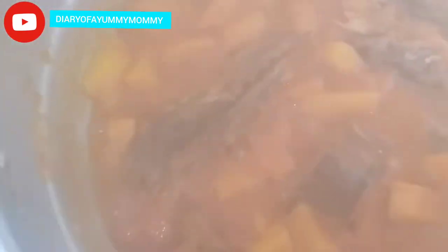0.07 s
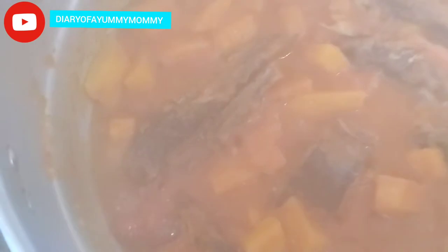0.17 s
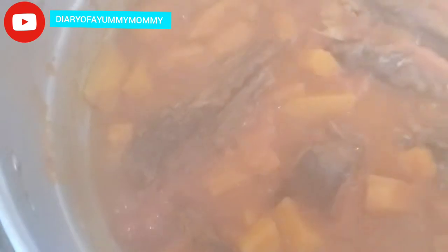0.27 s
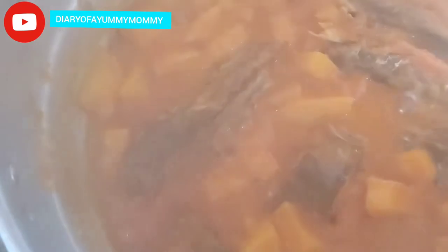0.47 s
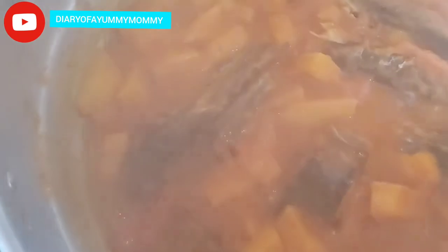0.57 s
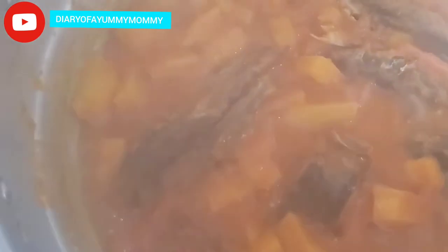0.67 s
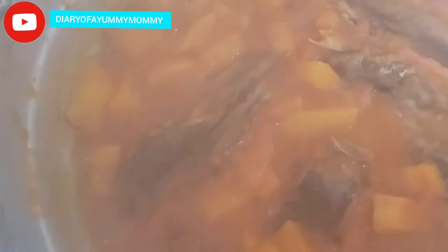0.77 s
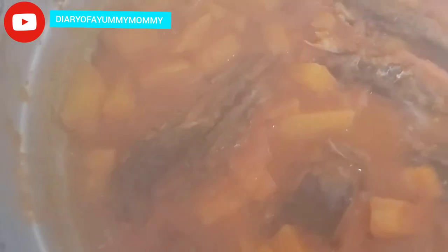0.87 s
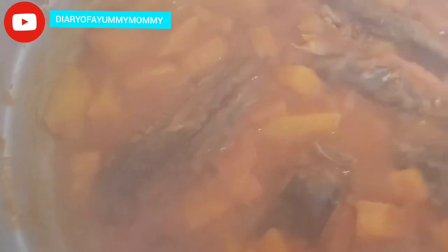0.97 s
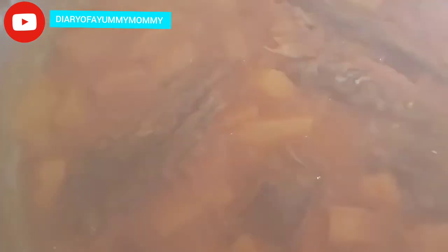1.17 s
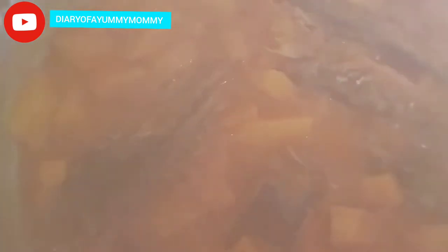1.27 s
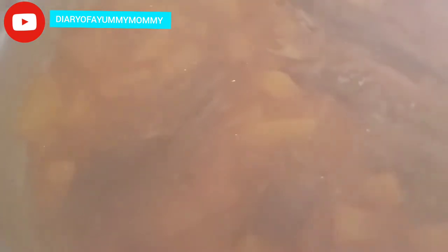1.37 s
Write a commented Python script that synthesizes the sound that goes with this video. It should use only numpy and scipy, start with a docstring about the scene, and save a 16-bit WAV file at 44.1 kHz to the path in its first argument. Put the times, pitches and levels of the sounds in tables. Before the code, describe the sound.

Thick porridge simmers close by with fizz, low plops and spits; a cabinet door knocks shut

```python
"""A fizz with low plops and sharp spits: thick porridge simmers in a pot close to a two-port phone microphone.
Off to the left a latch clicks, rattles and scrapes, then a cabinet door knocks shut and the kitchen booms.
The fizz is shaped noise, the bubbles are short gliding tones and the spits add a spray of noise.
Blows ring the modes of latch, spring, door panel and room. Gain control turns the simmer down after the knock."""
import sys
import numpy as np
from scipy import signal
from scipy.fft import rfft, irfft
from scipy.io import wavfile
from scipy.ndimage import uniform_filter1d

SR = 44100
rng = np.random.default_rng(int(sys.argv[2]) if len(sys.argv) > 2 else 0)


def ratio(d):
    """dB to gain"""
    e = np.asarray(d, float) / 20
    return 10 ** e


def store_pcm(level_fs):
    """Save levels as 16-bit WAV."""
    pcm = np.round(np.clip(level_fs, -1, 1) * 32767).astype(np.int16)
    wavfile.write(sys.argv[1], SR, np.atleast_2d(pcm).T)


N = 61739  # samples, 1.4 s


def evened(x):
    """Scales to rms 1."""
    return x / np.sqrt(np.mean(x ** 2) + 1e-20)


def read(points, hz):
    """Reads a table on a log-frequency axis."""
    f, value = np.transpose(points)
    return np.interp(np.log(hz + 1), np.log(f + 1), value)


def add(mix, start_s, sound):
    """Mixes a sound in at its start time, cut at the end of the mix."""
    part = mix[..., round(start_s * SR):][..., :sound.shape[-1]]
    part += sound[..., :part.shape[-1]]


def coloured(x, points):
    """Filters by a table of frequency in Hz and gain in dB."""
    gain = ratio(read(points, np.fft.rfftfreq(x.shape[-1], 1 / SR)))
    return irfft(rfft(x) * gain, x.shape[-1])


# Likeness of the sound at the two ports. Each row: frequency in Hz, left-right correlation (-1 to 1).
PORT_LIKENESS = [(60, 0.95), (150, 0.97), (380, 1), (950, 0.36), (2380, -0.23), (5980, -0.16),
                 (15000, -0.16)]


def pair(a, b, hz):
    """Two ports that share the bass and differ in the treble, mixed from two independent spectra."""
    same = np.clip(read(PORT_LIKENESS, hz), -1, 1)[:, None]
    return np.array([a, same * a + np.sqrt(1 - same ** 2) * b])


# Colour of the simmer's fizz, with the kitchen's own hum at 275 Hz.
# Each row: frequency in Hz, relative density in dB per Hz.
FIZZ_COLOUR = [(30, -4.5), (70, -7), (130, -6.5), (200, -9), (250, -7), (275, 4), (305, -25), (400, -12.5),
               (520, -9.5), (700, -14), (1010, -14), (2500, -17.5), (4000, -21.5), (8000, -26),
               (12000, -29.5), (16000, -34)]
FIZZ_DB = -32  # rms ahead of the microphone
FIZZ_PATCH_DB, FIZZ_FLICKER_DB = 2.05, 1.75  # rms swing of the level


def fizz():
    """Random short-time spectra with patches and a flicker shared by all bands."""
    frames, hz = N // 128 + 5, np.fft.rfftfreq(512, 1 / SR)
    a, b, c, d, patches = rng.standard_normal((frames, 257, 5)).T
    patches = uniform_filter1d(patches, size=8, axis=0)  # across frequency
    patches = evened(uniform_filter1d(patches, size=12, axis=1))  # across time
    flicker = evened(uniform_filter1d(rng.standard_normal(frames), size=5))
    swing = ratio(FIZZ_PATCH_DB * patches + FIZZ_FLICKER_DB * flicker)
    spectra = pair(a + 1j * b, c + 1j * d, hz) * swing
    noise = signal.istft(spectra, nperseg=512, noverlap=384)[1][:, :N]
    return ratio(FIZZ_DB) * evened(coloured(noise, FIZZ_COLOUR))


GLIDE = 0.076  # pitch rises by twice this fraction over one span


def bubble(hz, cycles, glide):
    """A tone rising in pitch as the bubble opens; its soft-started envelope peaks at 1."""
    u = np.arange(int(3 * cycles * SR / hz)) * hz / SR / cycles  # time in spans of `cycles` cycles
    envelope = np.e * 4 * u * np.exp(-4 * u)  # highest a quarter of a span in
    return envelope * np.sin(2 * np.pi * cycles * (u + glide * u ** 2))


# Larger bubbles bursting in the pot. Each row: start in seconds, envelope peak in dB, starting pitch in Hz.
PLOPS = [(0.035, -21.5, 469), (0.093, -24.5, 476), (0.171, -44, 540), (0.2, -19, 480), (0.29, -29, 273),
         (0.353, -19.5, 476), (0.382, -21, 404), (0.423, -27.5, 546), (0.48, -23, 573), (0.506, -26, 580),
         (0.571, -20, 396), (0.69, -16, 565), (1.007, -20, 470), (1.075, -26.5, 560), (1.096, -22, 570),
         (1.148, -28, 530), (1.216, -23.5, 422), (1.292, -25.5, 520), (1.333, -22.5, 543),
         (1.357, -18.5, 480)]


def plops():
    """Larger bubbles, each one gliding tone alike at both ports."""
    out = np.zeros((2, N))
    for start_s, db, hz in PLOPS:
        add(out, start_s, ratio(db) * bubble(hz, 4.3, GLIDE)[None])
    return out


# Sharp spits around the pot. Each row: start in seconds, tone envelope peak in dB (mean of the sides),
# centre in Hz, left minus right in dB.
SPITS = [(0.0646, -29, 6800, 9), (.0874, -29, 2720, 8), (0.1158, -32.5, 1740, 9), (.120, -36, 12400, -4),
         (.1451, -34, 2980, 2), (0.1737, -29.5, 1860, 7), (0.2009, -21.5, 5300, 1.5),
         (0.206, -32, 5500, -3), (0.2696, -32, 1370, 8), (0.291, -25.5, 3500, 5), (.3040, -44, 2600, 6),
         (0.356, -33, 7500, -1), (0.38, -28.5, 2250, 8), (0.4457, -30, 3500, 3), (0.4553, -28, 2760, 15.5),
         (.484, -32.5, 11300, -2), (.669, -21.5, 2880, 5), (0.674, -40, 10500, -2), (.905, -34, 11500, 0),
         (1.009, -24.5, 4000, 7), (1.1007, -34, 4900, -19), (1.1065, -29.5, 5100, 11),
         (1.136, -38, 4800, -8), (1.1514, -31.5, 2330, 16), (1.175, -35, 6150, -6), (1.188, -25, 4830, 1),
         (1.2, -29, 4370, 16), (1.2285, -27, 2570, 7), (1.2534, -43, 1900, 27), (1.335, -20, 2830, 5),
         (1.3578, -20, 2780, 6)]
SPIT_CYCLES = 6.3  # cycles per envelope span
SPRAY_DB, SPRAY_T60_S = -1.5, 0.031  # starting rms over the tone's peak, decay time
SPRAY_SPREAD = 1.36  # band edges: centre divided and multiplied by this


def spits():
    """Each spit is a short high tone and a dying spray of band-passed noise."""
    out = np.zeros((2, N))
    t = np.arange(2048) / SR
    noises = rng.standard_normal((len(SPITS), 2, 2048))
    for (start_s, db, hz, pan_db), noise in zip(SPITS, noises):
        side = ratio(db + np.array([[.5], [-.5]]) * pan_db)
        band = signal.butter(2, [hz / SPRAY_SPREAD, hz * SPRAY_SPREAD], "bandpass", fs=SR)
        spray = ratio(SPRAY_DB - 60 * t / SPRAY_T60_S) * evened(signal.lfilter(*band, noise))
        add(out, start_s, side * bubble(hz, SPIT_CYCLES, GLIDE))
        add(out, start_s, side * spray)
    return out


def swarm(per_s, db, hz, octaves, cycles, count=24):
    """Many small bubbles of random time and size, drawn from `count` random pitches and sides."""
    out = np.zeros((2, N))
    for z, pan_db in rng.standard_normal((count, 2)):
        size = ratio(3.2 * np.minimum(rng.exponential(1, N), 3))  # 0 to 9.6 dB
        bursts = size * (rng.random(N) < per_s / count / SR)
        sound = bubble(np.clip(hz * 2 ** (octaves * z), 100, 14000), cycles, GLIDE)
        out += ratio(np.array([[pan_db], [-pan_db]])) * signal.oaconvolve(bursts, sound)[:N]
    return ratio(db) * evened(out)


def pot():
    """Plops and spits, large and small."""
    small_plops = swarm(per_s=240, db=-33, hz=511.6, octaves=0.324, cycles=4.22)
    small_spits = swarm(per_s=390, db=-45, hz=3500, octaves=0.783, cycles=SPIT_CYCLES)
    return small_plops + small_spits + plops() + spits()


def ring(modes):
    """Response of an object or room to one click; neighbouring modes start in opposite sense."""
    t = np.arange(SR // 2) / SR
    out = np.zeros(len(t))
    for k, (hz, db, t60) in enumerate(modes):
        out += (-1) ** k * ratio(db - 60 * t / t60) * np.sin(2 * np.pi * hz * t)
    return out


# Blows off to the left. Each row: start in seconds, contact length in seconds, chatter over first click
# (amplitude ratio), then drive levels in dB of latch, spring, door panel, low room boom and crack.
BLOWS = [(0.5297, 0.0017, 0.21, -9, -49, -24, -13, -9.5), (0.613, 0.0073, 1, -12, -21.5, -30, -22, -20),
         (0.634, 0.011, 0.64, -17.5, -42, -54, -54, -17.5),
         (0.663, 0.0048, 2, -25.5, -47, -23.5, -55, -17.5), (0.721, 0.0088, 2.3, -48, -55, -33, -55.5, -57),
         (0.7904, 0.0037, 0.22, -5, -57, -1.5, -10, 1.5)]
PUSH_RISE_S, CRACK_HOLD_S = 0.0018, 0.0081  # push peaks after / crack clatters this long before it dies


def blows():
    """Drives of latch, spring, panel, boom and crack: clicks with chatter, a soft push, a held clatter."""
    drive, t = np.zeros((5, N)), np.arange(4096) / SR
    push = t * np.exp(-t / PUSH_RISE_S)
    push /= push.sum()
    noises = rng.standard_normal((len(BLOWS), 4096))
    for (start_s, length, rough, *dbs), noise in zip(BLOWS, noises):
        chatter = np.exp(-t / length) * noise
        chatter /= np.linalg.norm(chatter)
        contact = (rough * chatter + signal.unit_impulse(4096)) / np.hypot(rough, 1)
        clatter = np.exp(-np.maximum(t - CRACK_HOLD_S, 0) / length) * noise
        clatter /= np.linalg.norm(clatter)
        shapes = np.array([contact, contact, contact, push, clatter])
        add(drive, start_s, ratio(np.array(dbs))[:, None] * shapes)
    return drive


# Loudness of the latch scraping before the door meets the frame. Each row: time in seconds, level in dB.
SCRAPE_LEVEL = [(.73, -39), (.745, -19), (0.769, -18.5), (0.791, -15.5), (0.797, -20)]
# Colour of that scrape. Each row: frequency in Hz, relative density in dB per Hz.
SCRAPE_COLOUR = [(150, 0.5), (450, 2), (900, 7), (1500, -1), (2050, -6.5), (2480, -3), (2900, -11),
                 (4500, -17), (9000, -24), (16000, -48)]


def latch_scrape():
    """The latch rubbing, as coloured noise whose level follows the table, silent outside it."""
    level_db = np.interp(np.arange(N) / SR, *np.transpose(SCRAPE_LEVEL), left=-120, right=-120)
    return ratio(level_db) * evened(coloured(rng.standard_normal(N), SCRAPE_COLOUR))


# Colour of the door's crack. Each row: frequency in Hz, relative gain in dB.
CRACK_COLOUR = [(700, 4), (1100, 0.5), (1700, 0.5), (2550, 2.5), (3200, 0), (5000, -7), (8000, -15),
                (16000, -21.5)]


def door_crack(drive):
    """The bright part of each blow: its clatter coloured and freed of lows."""
    high = signal.butter(3, 550, "highpass", fs=SR, output="sos")
    return signal.sosfilt(high, 20 * coloured(drive, CRACK_COLOUR))


# Modes of the latch. Each row: frequency in Hz, relative level in dB, decay time t60 in seconds.
LATCH_MODES = [(526, 3.5, 0.023), (614, -25, 0.017), (860, 2.5, 0.017), (940, 7.5, 0.029),
               (1398, -5.5, 0.06), (1850, -5, 0.018), (1920, -16, 0.072), (2350, 2, 0.013),
               (2587, -4.5, 0.062), (2700, -27, 0.04), (4230, -3, 0.021), (4900, -15, 0.011)]
# Modes of the latch spring. Each row: frequency in Hz, relative level in dB, decay time t60 in seconds.
SPRING_MODES = [(3359, 8, .15), (3908, -1.5, .05)]
# Modes of the door panel and of the kitchen it sets booming.
# Each row: frequency in Hz, relative level in dB, decay time t60 in seconds.
PANEL_AND_ROOM_MODES = [(60.8, -6, 0.46), (113.8, -5, 0.66), (286, -9, 0.35), (318, -7, 0.14),
                        (378, -4.5, 0.057), (377, -1.5, 0.1), (432, 0.5, 0.072), (870, -35, 0.02),
                        (1942, -12, 0.15), (2066, -28, 0.11), (2513, -19, 0.29), (2674, -7, .1)]
BOOM_TOP_HZ = 200  # room modes below this are driven by the push
METAL_ROOM_DB, SPRING_ROOM_DB, PANEL_ROOM_DB, CRACK_ROOM_DB = -7, -10, -3.5, 0  # sends to the kitchen


def door():
    """Blows ring latch, spring, panel and room, with scrape and crack; returns (direct, sent to the room)."""
    drive = blows()
    scrape = latch_scrape()
    low = [m for m in PANEL_AND_ROOM_MODES if m[0] < BOOM_TOP_HZ]
    high = PANEL_AND_ROOM_MODES[len(low):]
    bodies = ring(LATCH_MODES), ring(SPRING_MODES), ring(high), ring(low)
    latch, spring, panel, boom = (signal.oaconvolve(d, b)[:N] for d, b in zip(drive, bodies))
    crack = door_crack(drive[4])
    sent = ratio(METAL_ROOM_DB) * (latch + scrape) + ratio(SPRING_ROOM_DB) * spring
    sent += ratio(PANEL_ROOM_DB) * panel + ratio(CRACK_ROOM_DB) * crack
    return latch + spring + scrape + panel + boom + crack, sent


# Reverberation of the kitchen. Each row: frequency in Hz, decay time t60 in seconds.
KITCHEN_T60 = [(60, 1), (250, 0.32), (1000, 0.58), (3000, 0.5), (8000, 0.51), (15000, 0.45)]


def kitchen(x):
    """Sparse taps of random sign, each band dying at its own speed."""
    taps = np.zeros((2, SR))
    slots = np.arange(200, SR - 20, 20)[None]
    at = slots + rng.integers(0, 20, (2, (SR - 201) // 20))  # one tap in every 20 samples
    np.put_along_axis(taps, at, rng.choice([-1., 1.], at.shape), 1)
    hz, t, z = signal.stft(taps, SR, nperseg=512)
    decay = ratio(-60 * t / read(KITCHEN_T60, hz)[:, None])
    tail = signal.istft(pair(*z, hz) * decay, SR, nperseg=512)[1]
    return signal.fftconvolve(x[None], tail / np.linalg.norm(tail[0]), axes=1)[:, :N]


RIGHT_LAG_S = 0.000436  # the door reaches the right port later
POT_ROOM_DB = -6  # send of the plops and spits to the kitchen


def scene():
    """Pot near, door to the left, both in the kitchen."""
    near, (far, sent) = pot(), door()
    late = np.interp(np.arange(N) - RIGHT_LAG_S * SR, np.arange(N), far)
    room = kitchen(sent + ratio(POT_ROOM_DB) * near.mean(0))
    return fizz() + near + np.array([far, late]) + room


AGC_KNEE_DB, AGC_SHARE = -18.5, 0.44  # level where gain falls, dB of cut per dB above it
AGC_SMOOTH_S, AGC_RECOVER_DB_PER_S = 0.4, 0.4


def gain_control(x):
    """Gain falls after loud sounds and recovers slowly."""
    power_db = 10 * np.log10(abs(uniform_filter1d((x ** 2).mean(0), size=2048)) + 1e-12)
    over_db = AGC_SHARE * np.maximum(power_db - AGC_KNEE_DB, 0)
    fall = np.arange(N) * AGC_RECOVER_DB_PER_S / SR
    held_db = np.maximum.accumulate(over_db + fall) - fall  # peak hold with a slow release
    keep = np.exp(-1 / (AGC_SMOOTH_S * SR))
    cut_db = signal.lfilter([1 - keep], [1, -keep], np.maximum(held_db, 0))
    return x / ratio(cut_db)


# Difference in colour of the phone's two ports. Each row: frequency in Hz, left minus right in dB.
PORT_COLOUR = [(60, 0.5), (150, 0.5), (380, -0.5), (950, 0.5), (2380, -0.5), (5980, -7.5), (15000, 3.5)]


def microphone(dry):
    """The phone's two ports: a low cut, then half the colour difference on each side."""
    low_cut = signal.butter(3, 42, "highpass", fs=SR, output="sos")
    dry = signal.sosfilt(low_cut, dry)
    ports = []
    for v, half in zip(dry, (.5, -.5)):
        ports.append(coloured(v, [(f, half * db) for f, db in PORT_COLOUR]))
    return np.array(ports)


def low_pass(x):
    """Removes everything above the highest recorded frequency."""
    return signal.sosfilt(signal.butter(12, 16100, fs=SR, output="sos"), x)


def record(dry):
    """The phone microphone, its gain control and clipped peaks."""
    mix = np.clip(gain_control(microphone(dry)), -1, 1)
    return low_pass(mix)


dry = scene()
out = record(dry)
store_pcm(out)
```